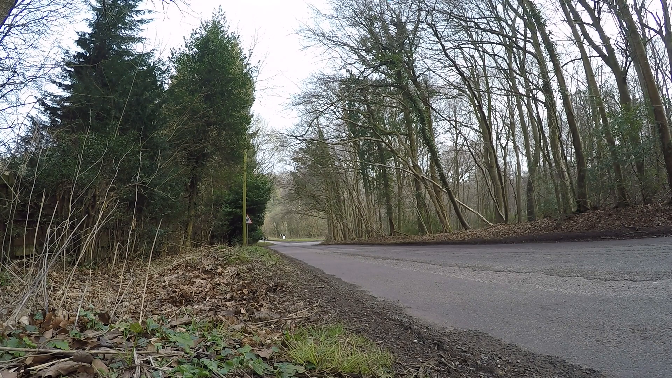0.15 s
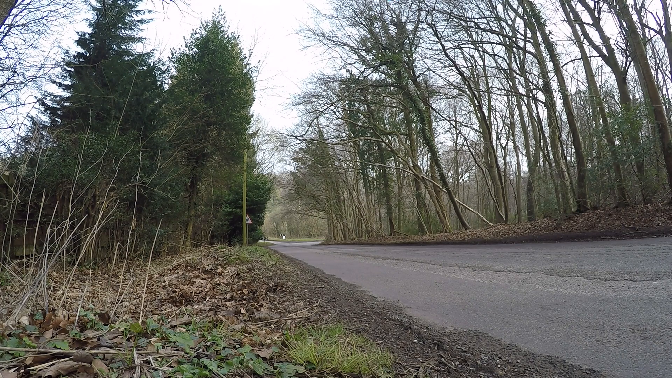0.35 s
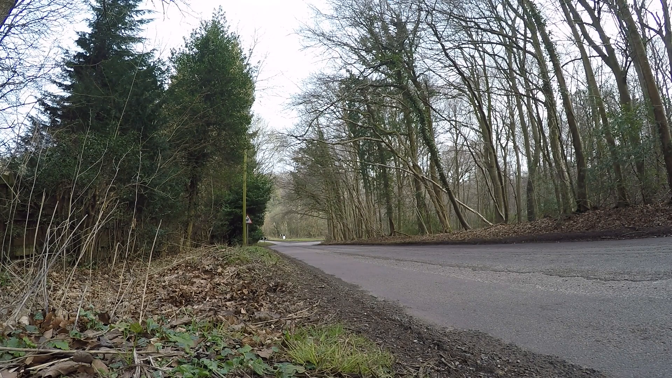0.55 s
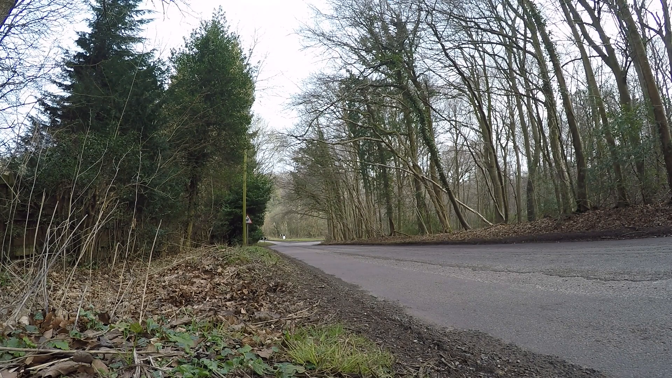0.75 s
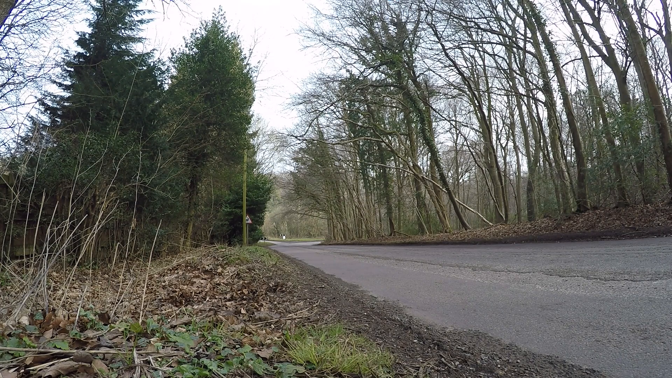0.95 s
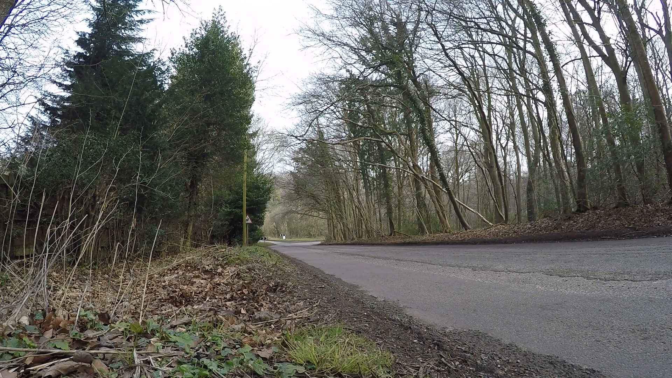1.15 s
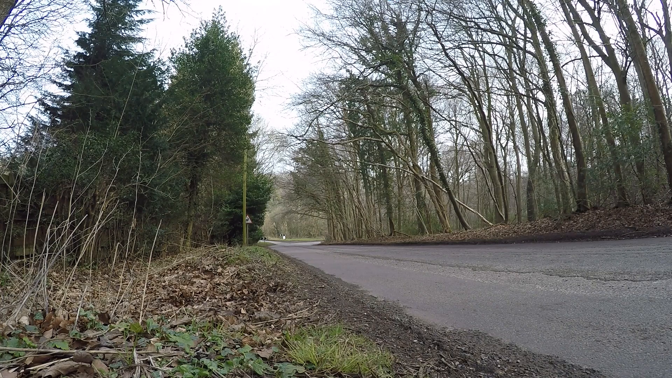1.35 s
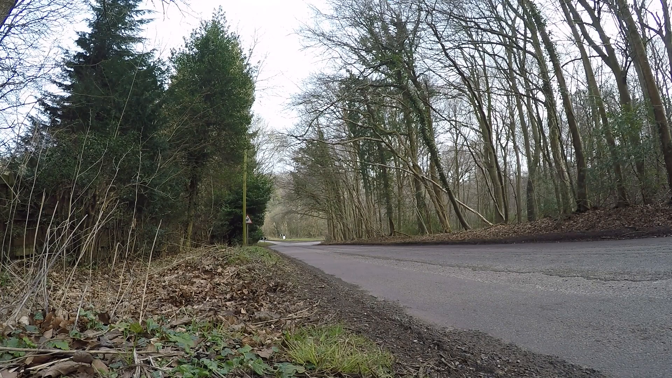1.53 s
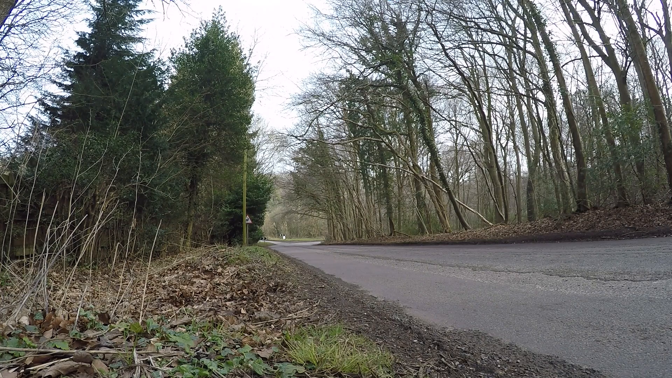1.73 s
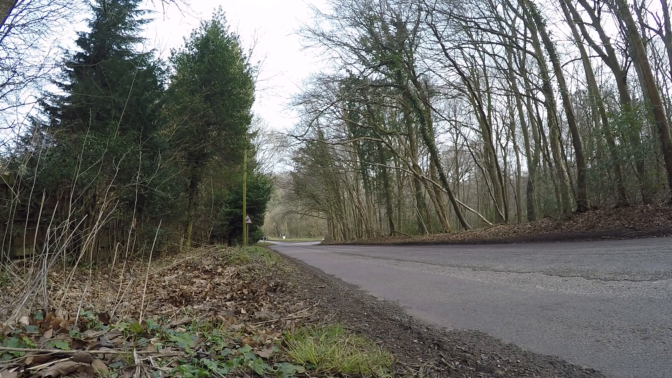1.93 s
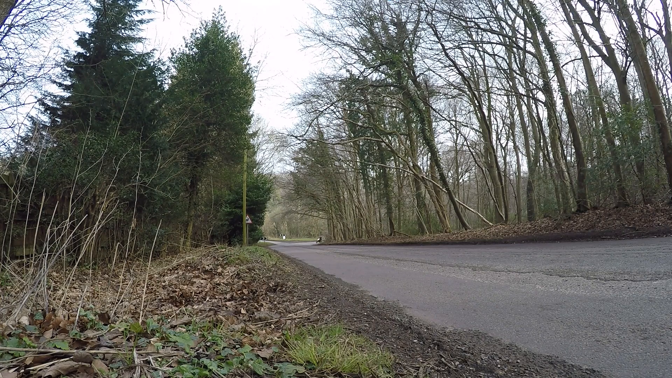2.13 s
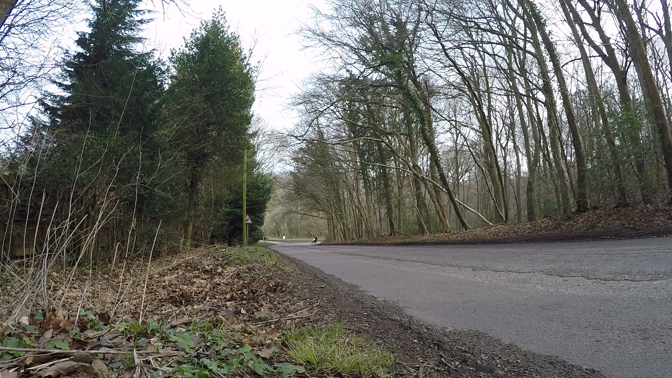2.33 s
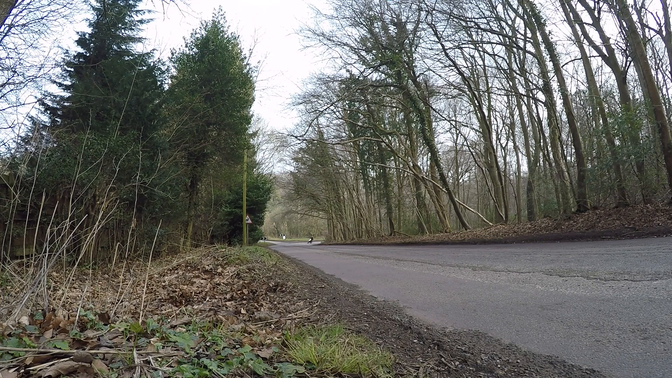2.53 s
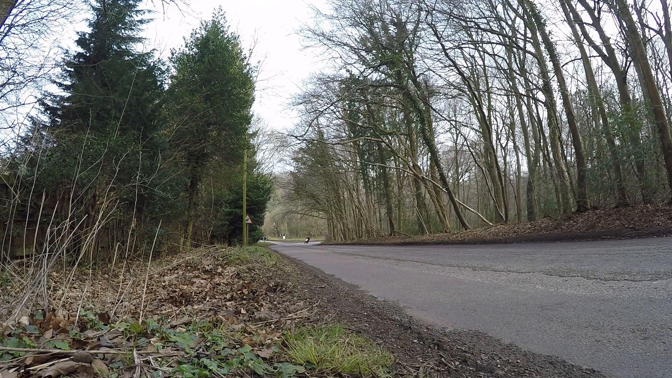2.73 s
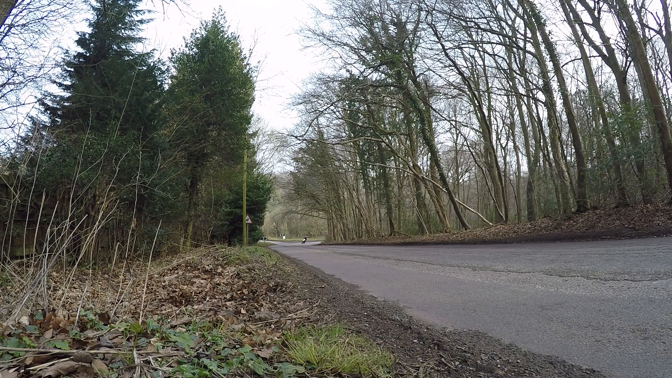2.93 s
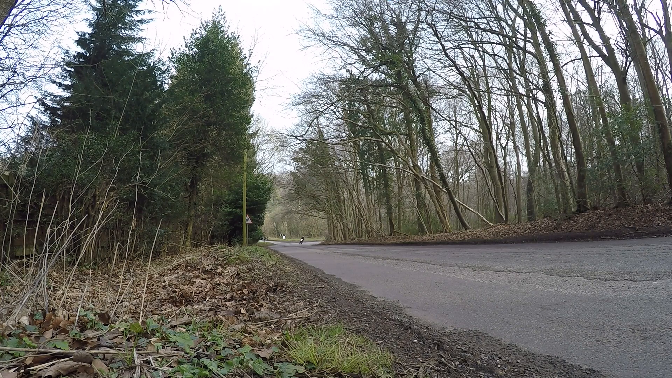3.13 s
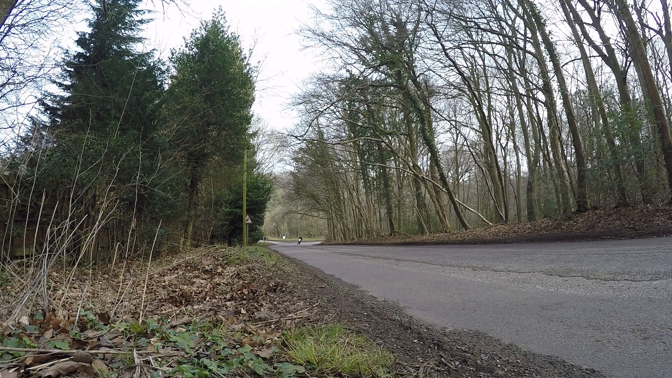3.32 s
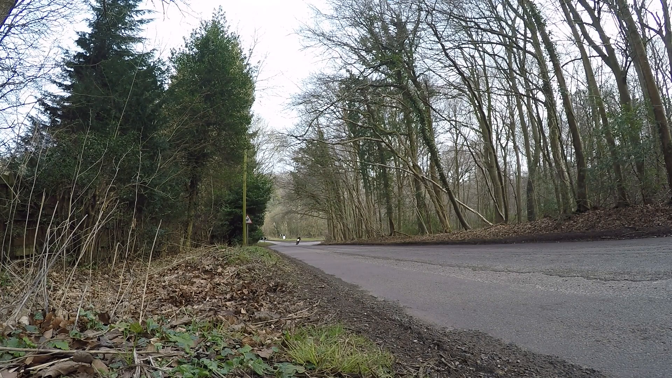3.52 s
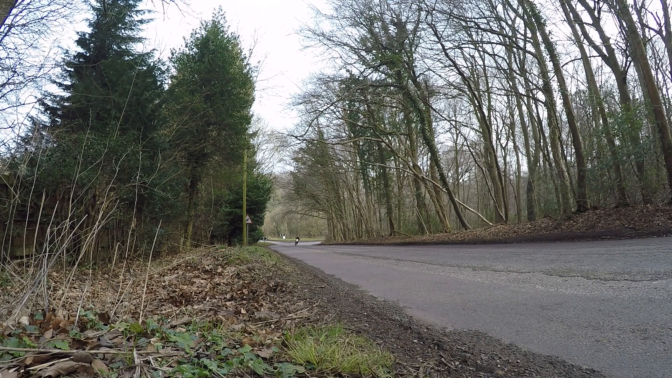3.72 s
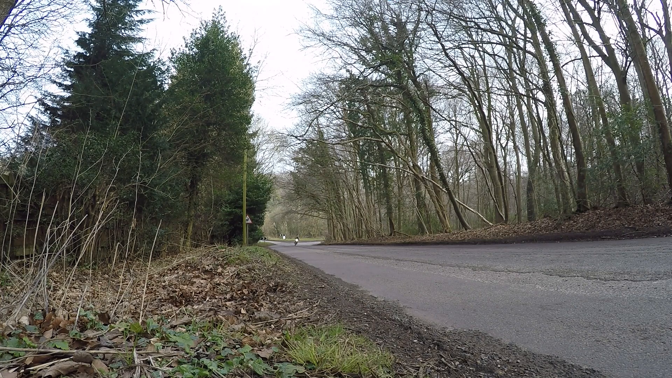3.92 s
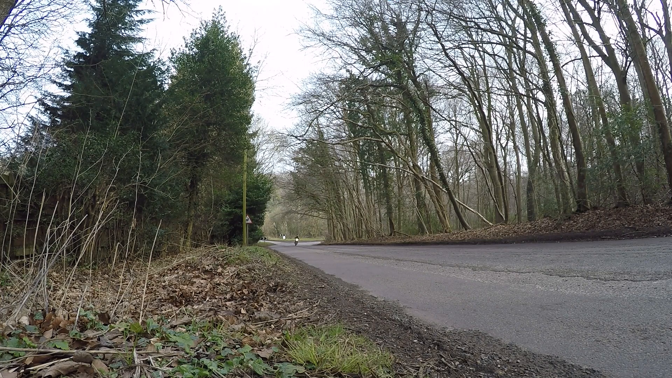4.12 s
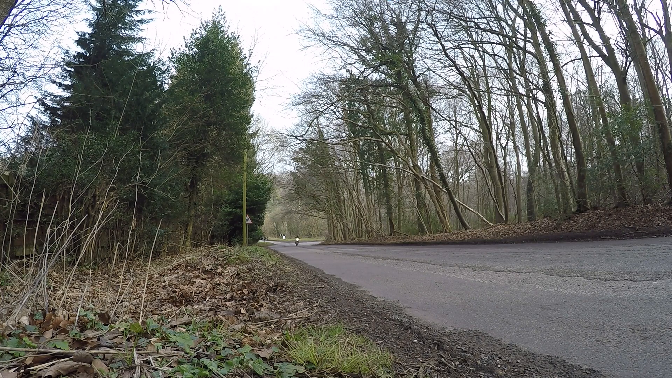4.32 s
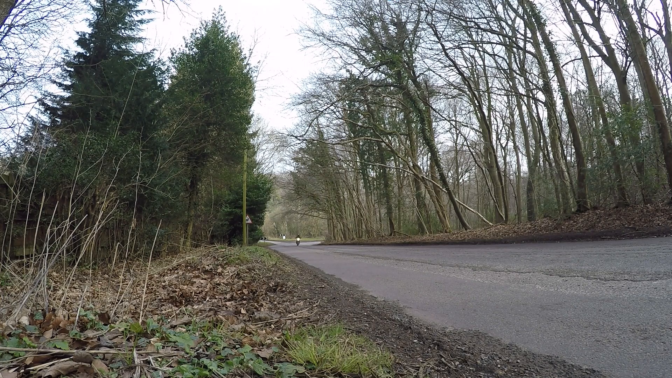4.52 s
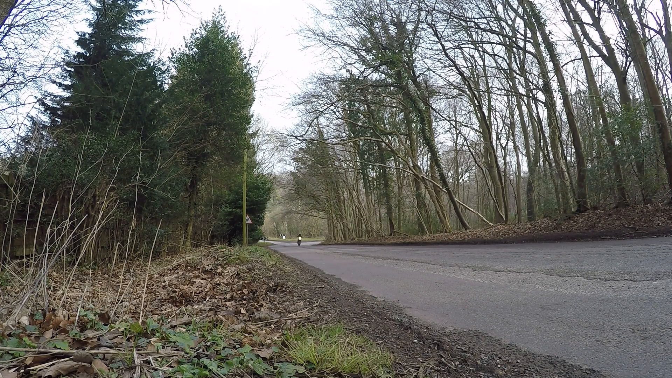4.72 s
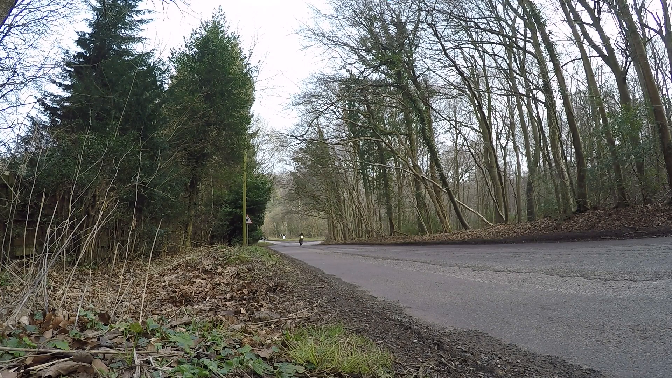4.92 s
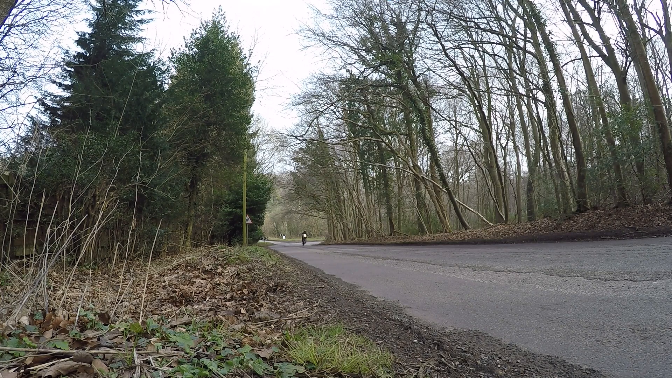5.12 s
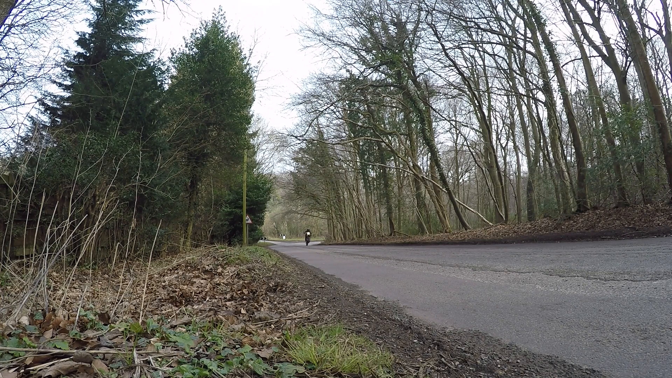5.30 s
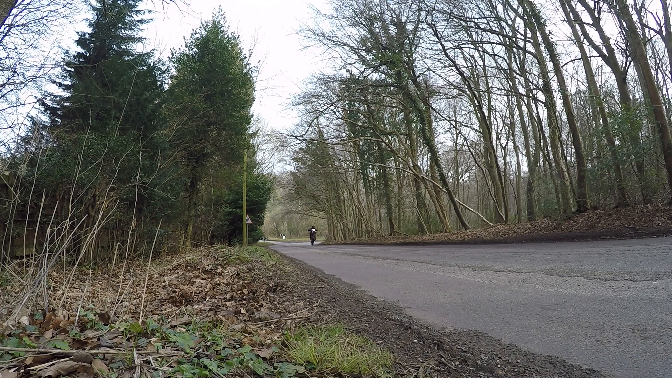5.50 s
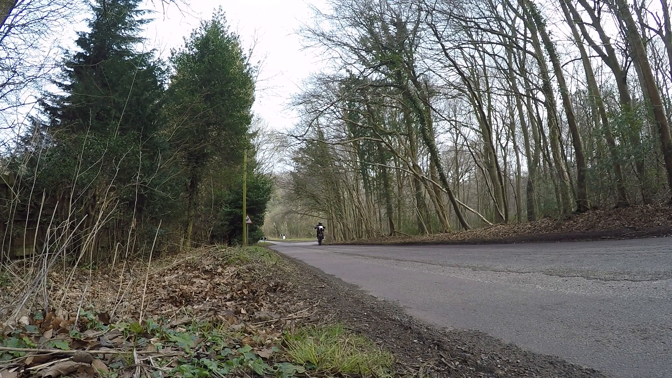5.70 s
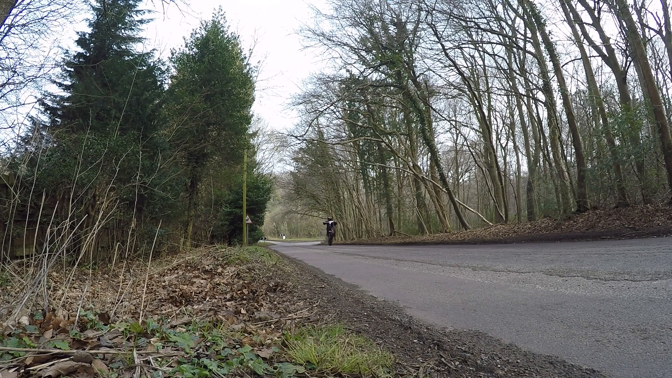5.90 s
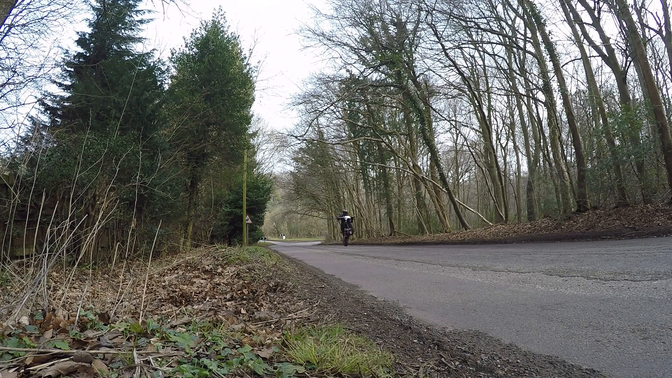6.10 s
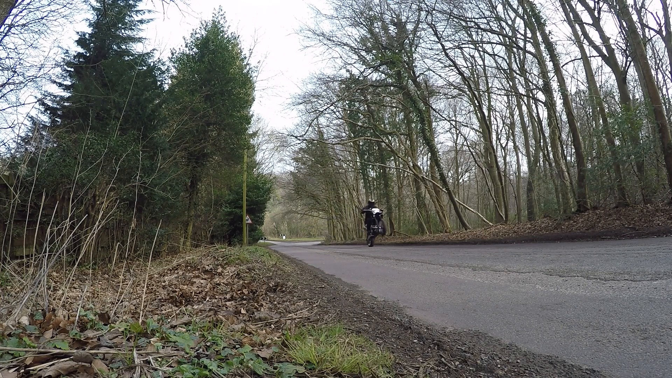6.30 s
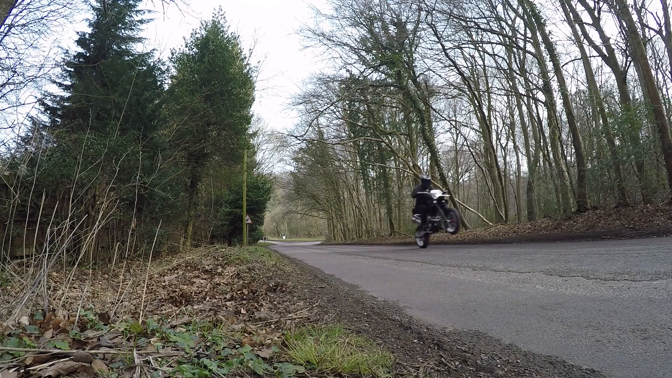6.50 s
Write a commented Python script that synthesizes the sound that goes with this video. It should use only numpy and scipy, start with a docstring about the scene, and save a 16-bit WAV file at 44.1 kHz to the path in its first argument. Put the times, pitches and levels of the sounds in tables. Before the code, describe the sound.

Quiet forest air and light microphone hiss surround a distant single-cylinder motorcycle. From 0 to 2 seconds it coasts, soft low thumps slowing from about 45 to 32 per second while an initial echoing wash fades among the trees; a thin high whine, sinking slightly, flickers around 0.5 to 1.2 seconds. At about 2.2 seconds the revs jump in a brief downshift blip, ringing in the wood with a faint hiss, then drop back. From 2.6 seconds the engine pulls, slowly at first, the firing rate climbing and the drone growing stronger from 4 seconds. Growl, bark and gas rasp thicken, with a hard echo. Around 5.6 to 6.1 seconds the power surges and sags briefly. From 6.15 seconds the exhaust brays harshly, bright and crackling, overloading the roadside microphone until the sound ends at 6.55 seconds, at its loudest, just before passing.

```python
"""On a quiet forest road a single-cylinder four-stroke supermoto rolls towards the microphone, coasting under a thin
whine; its revs blip for a downshift, with a hiss behind them, then it pulls hard until it is nearly alongside.
Each firing thumps the lowest orders, rings the open pipe and drives out rasping gas; one hard echo doubles this and
the tree trunks scatter it. Close by, the pipe mouth brays, and the loudest peaks overload the microphone."""
import sys
import numpy as np
from scipy import signal
from scipy.fft import rfft, irfft, next_fast_len
from scipy.io import wavfile
from scipy.ndimage import uniform_filter1d

SR = 44100
rng = np.random.default_rng(int(sys.argv[2]) if len(sys.argv) > 2 else 0)


def output_pcm(signal):
    """Save a mono or channel-first signal as 16-bit PCM at the path in sys.argv[1].

    Samples are clipped to [-1, 1] before scaling.
    """
    pcm = np.clip(np.atleast_2d(signal).T, -1, 1) * 32767
    wavfile.write(sys.argv[1], SR, np.round(pcm).astype(np.int16))


N = 288855
TIME = np.arange(N) / SR
# closest distance of the bike's line to the microphone, and the distance at which levels are stated
KERB_M, REFERENCE_M = 1.8, 30
# distance around which the straight path starts to win over the trees
CLEAR_M = 9.8


def undb(db):
    """Decibels to gain."""
    return 10 ** (np.asarray(db) / 20)


def curves(table):
    """Each column of a table, joined by straight lines in time."""
    s, *columns = np.transpose(table)
    return [np.interp(TIME, s, column) for column in columns]


def unit(x):
    """Scale to rms 1."""
    return x / np.sqrt(np.mean(x ** 2))


def band(x, lo_hz, hi_hz, order=3):
    """Band-pass; the lower the band, the later its pulses arrive."""
    edges_hz = [lo_hz, min(hi_hz, .47 * SR)]
    return signal.sosfilt(signal.butter(order, edges_hz, "band", fs=SR, output="sos"), x)


def ring(x, modes):
    """Sum of resonances, each given by its Hz, width in Hz and dB."""
    return sum(undb(db) * signal.lfilter(*signal.iirpeak(hz, hz / width, fs=SR), x)
               for hz, width, db in modes)


def noise(points):
    """Noise of rms 1 whose spectrum runs through points of Hz and relative dB."""
    hz, db = np.transpose(points)
    size = next_fast_len(N)
    bins_hz = np.maximum(np.fft.rfftfreq(size, 1 / SR), 1)
    gain = undb(np.interp(np.log(bins_hz), np.log(hz), db))
    return unit(irfft(rfft(rng.standard_normal(size)) * gain, size)[:N])


def at_level(x, db, size=3500):
    """Give a sound (channels, samples) a running level; single firings keep their shape."""
    power = uniform_filter1d(uniform_filter1d(np.mean(x ** 2, axis=0), size), size)
    return x * undb(db) / np.sqrt(np.maximum(power, 1e-18))


def walk(rate):
    """Random levels held 1 / rate s and slewed twice; spread near 1."""
    k = int(SR / rate)
    held = np.repeat(rng.standard_normal(256), k)[:N]
    return 1.3 * uniform_filter1d(uniform_filter1d(held, k), k)


def per_firing(cycles):
    """One random value for each firing, gliding over to the next between the firings."""
    draws = rng.standard_normal(1024)
    held = draws[np.floor(cycles + .4).astype(int) + 1]
    return uniform_filter1d(uniform_filter1d(held, size=230), size=230)


def throttle():
    """Opening of the throttle, 0-1."""
    # nearly shut, a long steady roll on, then brief lifts. Each row: time in seconds, opening 0-1
    opening = [(1.25, 0.08), (1.6, 0.13), (1.92, 0.23), (2.17, 0.23), (2.25, 0.28), (2.42, 0.34),
               (2.73, 0.4), (3.4, 0.56), (3.71, 0.53), (3.86, 0.67), (4.03, 0.73), (4.4, 0.84),
               (4.635, 0.75), (4.685, 0.96), (5.53, 0.86), (5.67, 0.68), (5.84, 0.87), (6.0, 0.69),
               (6.13, 0.59), (6.23, 0.72), (6.55, 0.86)]
    return np.clip(curves(opening)[0], 0, 1)


def distance():
    """Metres from the microphone to the bike, which rides a straight line at a steady speed."""
    speed_m_s, passes_s = 21.2, 6.952
    return np.hypot(speed_m_s * (passes_s - TIME), KERB_M)


def loudness(register):
    """A register of the exhaust grows with the throttle and with nearness."""
    full_db, shut_db, bend, halving_db = register
    return full_db - shut_db * (1 - throttle()) ** bend + halving_db * np.log2(REFERENCE_M / distance())


def trees(x, t60_s=1.0, first_s=0.025, side_db=-17):
    """Countless echoes, as from trunks, nearly alike at the two close microphone ports."""
    t = np.arange(SR) / SR
    envelope = np.exp(-np.log(1000) * t / t60_s) * (1 - np.exp(-t / first_s))
    mid, side = rng.standard_normal((2, SR)) * envelope
    echoes = (mid + undb(side_db) * np.array([side, -side])) / np.linalg.norm(mid)
    return signal.fftconvolve(x[None], echoes, axes=1)[:, :N]


def background(air_db=-38, flicker_db=2):
    """Quiet air and microphone hiss under flickering whines of narrow noise; the lowest sinks in pitch."""
    # still forest air and microphone hiss. Each row: frequency in Hz, relative level in dB
    air = [(30, 16), (100, 20), (400, -6.5), (1500, -13.5), (4000, -18.5), (8000, -37.5), (15000, -36)]
    # faint high whines. Each row: centre in Hz, width in Hz, level in dB before the flicker
    high_whines = [(7250, 800, -76.5), (8330, 110, -78), (13600, 600, -86)]
    # whine that comes and goes as the bike coasts. Each row: time in seconds, level in dB before the flicker
    coast_level = [(0, -87), (0.5, -65), (1.1, -71), (1.5, -96)]
    coast_hz, sag_hz_per_s, coast_width_hz = 3750, 210, 130

    def whine(hz, width):
        lowpass = signal.butter(2, width / 2, fs=SR, output="sos")
        waver = signal.sosfilt(lowpass, rng.standard_normal(N))
        carrier = np.cos(2 * np.pi * np.cumsum(hz * np.ones(N)) / SR)
        return unit(waver * carrier) * undb(flicker_db * walk(9.55))

    high = sum(undb(db) * whine(hz, width) for hz, width, db in high_whines)
    coast = whine(coast_hz - sag_hz_per_s * TIME, coast_width_hz)
    return undb(air_db) * noise(air) + high + undb(curves(coast_level)[0]) * coast


def wash(fade_db_per_s=16, rise_s=0.0077):
    """Hard bursts of throttle ring on in the wood: coloured noise that rises fast and fades slowly."""
    # colour of the ringing wood. Each row: frequency in Hz, relative level in dB
    wood_colour = [(200, 5.5), (300, 5.5), (450, -1.5), (1200, -4), (1950, -3), (2900, -8.5), (4500, -19),
                   (7000, -38), (12000, -57)]
    # bursts that ring on. Each row: start in seconds, level in dB from which it fades
    bursts = [(0, -41), (2.22, -48.5)]
    level = 0
    for start_s, db in bursts:
        t = np.maximum(TIME - start_s, 0)
        level = level + undb(db - fade_db_per_s * t) * (1 - np.exp(-t / rise_s))
    return noise(wood_colour) * level


def thump(cycles, hz, lag_s=0.02963, trim_db=0.7):
    """The slugs of gas leaving the pipe push out the lowest orders; no two firings are equally strong."""
    # lowest engine orders. Each row: multiple of the firing rate, relative dB, dB more at full throttle
    low_orders = [(1, -2, -4.5), (2, 0.5, -1.5), (3, -1.5, -7.5)]
    # how well the pipe carries them. Each row: frequency in Hz, relative level in dB
    drone_colour = [(30, 1.5), (45, -3), (64, 2), (72, -1.5), (86, 2), (103, -6.5), (118, 0), (130, 4.5),
                    (150, -1.5), (185, 2.5), (205, 2)]
    # running level of the low drone. Each row: time in seconds, level in dB before the trim
    drone_level = [(0, -26.5), (0.4, -26), (1.2, -36.5), (2.12, -32.5), (2.3, -29.5), (2.55, -33.5),
                   (3.7, -32), (4.1, -22), (4.55, -19.5), (4.68, -23), (4.9, -18.5), (5.15, -21),
                   (5.4, -18), (5.6, -20), (6.0, -18.5), (6.27, -9), (6.38, -16), (6.55, -11)]
    scatter_db, waver_db = 1.3, 1.4
    wobble = .018  # firings, at full throttle
    late = cycles - lag_s * hz + wobble * throttle() * walk(14)
    colour_hz, colour_db = np.transpose(drone_colour)
    orders = np.zeros(N)
    for k, db, load_db in low_orders:
        carried_db = np.interp(k * hz, colour_hz, colour_db)
        random_db = waver_db * walk(11) + scatter_db * per_firing(cycles)
        gain = undb(db + load_db * throttle() + carried_db + random_db)
        orders -= gain * np.cos(2 * np.pi * round(k) * late)
    return at_level(orders[None], curves(drone_level)[0] + trim_db)[0]


def round_trips(x, trip_s=0.00654, heat=0.26, return_db=-4, flow_loss_db=-10, dull_hz=520, count=3):
    """The pressure wave runs up and down the pipe, duller each time; hot gas speeds it, strong flow damps it."""
    trip = trip_s / (1 + heat * throttle())
    kept = undb(return_db + flow_loss_db * throttle() ** 2)
    waves = [x]
    for _ in range(count):
        rounded = signal.lfilter(*signal.butter(1, dull_hz, fs=SR), waves[-1])
        waves.append(kept * np.interp(TIME - trip, TIME, rounded, left=0))
    return sum(waves)


def blowdown(cycles, hz):
    """One pressure spike per firing rings the pipe; under load firings are more even in time, less in strength."""
    # silencer resonances. Each row: frequency in Hz, width in Hz, relative level in dB
    pipe_modes = [(131, 39, 7), (211, 84, 10.5), (290, 34, 0), (341, 330, -0.5), (417, 46, -1),
                  (600, 310, -5), (920, 170, -9), (1330, 280, 3)]
    # load steepens the pressure front: corner of the pulse, throttle shut and open
    shut_hz, open_hz, bend = 61.5, 1250, 1.37
    corner_hz = shut_hz + (open_hz - shut_hz) * throttle() ** bend
    scatter_db = .7 + 1.1 * throttle() ** 2
    idle_jitter, load_jitter = .007, .005  # firings
    jitter = idle_jitter + (load_jitter - idle_jitter) * throttle()
    z = np.exp(-hz / corner_hz + 2j * np.pi * (cycles + jitter * per_firing(cycles)))
    # a geometric series from the fourth order up: the higher the corner, the sharper the spike
    spikes = np.real(z ** 4 / (1 - z))
    uneven = spikes * undb(scatter_db * per_firing(cycles))
    return unit(ring(round_trips(uneven), pipe_modes))


def gas(cycles, far_decay=0.27, near_decay=0.17, steady=0.057):
    """Turbulent gas bursts out and dies away within each cycle; close by, the bursts are crisper."""
    # gas jet at the pipe mouth. Each row: frequency in Hz, relative level in dB
    jet_colour = [(300, 2.5), (600, -5.5), (1050, -2.5), (1500, -1), (2200, -2.5), (3100, -4.5),
                  (4400, -7.5), (6500, -18.5), (9000, -23), (12500, -33.5), (15500, -58)]
    scatter_db = 1.4
    decay = near_decay + (far_decay - near_decay) / (1 + (CLEAR_M / distance()) ** 2)  # in firings
    puff = np.exp(-(cycles % 1) / decay) * undb(scatter_db * per_firing(cycles))
    return unit((steady + puff) * noise(jet_colour))


def shock(cycles, hz, front_s=0.00012, smear_s=0.011, smear_db=0):
    """Under load each firing leaves the pipe as a sharp crack with a short rattle behind it."""
    jitter = .011  # firings
    since_s = ((cycles + jitter * per_firing(cycles) + .5) % 1 - .5) / hz
    crack = band(-np.exp(-(since_s / front_s) ** 2) * throttle(), 620, 4700, order=1)
    rattle = trees(crack, t60_s=smear_s, first_s=0.00056)[0]
    return unit(crack + undb(smear_db) * rattle)


def surges():
    """Gain of the exhaust as the combustion surges and sags."""
    # firings that burn harder or weaker. Each row: centre in seconds, half length in seconds, gain in dB
    burns = [(2.23, 0.037, 8.5), (2.422, 0.069, -8), (2.73, 0.036, -6), (2.775, 0.013, 3),
             (3.693, 0.073, 0), (3.82, 0.0059, 3), (3.88, 0.0098, 0.5), (4.44, 0.3, -2), (4.622, .05, 0),
             (5.367, 0.15, 1.5), (5.647, 0.1, -3.5), (5.794, 0.11, 1.5), (6.043, 0.084, -2.5),
             (6.243, 0.093, 0)]
    return undb(sum(db * np.exp(-((TIME - s) / half_s) ** 2) for s, half_s, db in burns))


def two_paths(x, echo_s=0.0259, straight_db=-4, halving_db=7.5):
    """Straight sound and one hard echo from behind the microphone: orders swell and fade through their comb."""
    # the ground weakens the straight path against the echo, less so as the bike nears
    straight = undb(straight_db + halving_db * np.log2(REFERENCE_M / distance()))
    echo = np.interp(TIME - echo_s, TIME, x, left=0)
    return (straight * x + echo) / np.hypot(straight, 1)


def ports(x, lag_s=0.00002, scatter_db=3, nearness=1.64):
    """Close by, the left port hears later, and a short diffuse scatter joins the two with opposite signs."""
    lag = lag_s * (KERB_M / distance()) ** 1.1
    slope = np.gradient(x, axis=1) * SR
    diffuse = trees(x[0], t60_s=0.0024, first_s=0.00033)[0]
    scatter = undb(scatter_db) * (KERB_M / distance()) ** nearness * diffuse
    return x + np.array([[-1], [1]]) * (slope * lag / 2 + scatter)


def motorcycle():
    """Thump, ringing pipe and gas jet, heard straight, off one hard echo and through the trees."""
    # engine speed as heard. Each row: time in seconds, firings per second in Hz
    firing_rate = [(0, 44.79), (0.474, 42.03), (0.974, 39.49), (1.274, 36.67), (1.624, 35.78),
                   (2.104, 31.91), (2.274, 44.27), (2.564, 31.54), (2.874, 32.22), (3.374, 34.16),
                   (3.674, 36.29), (4.024, 40.8), (4.134, 41.81), (4.324, 44.32), (4.524, 45.01),
                   (4.774, 51.62), (4.944, 53.34), (5.494, 64.04), (5.674, 64.34), (5.894, 68.37),
                   (6.004, 67.6), (6.074, 64.19), (6.154, 66.31), (6.234, 65.36), (6.55, 71.92)]
    # the pipe mouth whistles in the gas. Each row: frequency in Hz, width in Hz, relative level in dB
    mouth_modes = [(1320, 1400, 9.5), (1690, 200, -22), (2330, 920, 8)]
    # bass from the trees against the straight path. Each row: time in seconds, relative level in dB
    bass_scatter = [(0, 3), (2.2, -0.5), (2.8, -12.5), (3.85, -4.5), (4.5, 2.5), (5.4, 5), (5.85, 3),
                    (6.55, 1.5)]
    # registers from deep to bright. Each row: dB at full throttle and the reference distance,
    # dB lost with the throttle shut, bend of that loss (higher speaks earlier), dB gained per halved distance
    boom_level = (-20.5, 18.5, 5.5, 4)
    growl_level = (-17.5, 45, 3, 4.5)
    bark_level = (-19, 76.5, 3, 3.5)
    rasp_level = (-20, 57, 1.55, 5)
    crackle_level = (-19, 72.5, 1.5, 5.5)
    hiss_level = (-25.5, 78, 1.9, 7)
    sizzle_level = (-37.5, 49.5, 1.13, 14)

    hz, = curves(firing_rate)
    cycles = np.cumsum(hz) / SR - .22  # counts the firings
    # from far off the ground weakens the straight path of the treble, so most of it comes from the trees
    bass_wet = undb(curves(bass_scatter)[0])
    treble_wet = undb(4.5) / (1 + (CLEAR_M / distance()) ** 2) ** 1.66

    low = thump(cycles, hz)
    pipe = two_paths(blowdown(cycles, hz))
    jet = two_paths(gas(cycles))
    crack = two_paths(shock(cycles, hz))

    low = undb(-0.5) * low + undb(-6.5) * trees(low, t60_s=1.0, side_db=-20.5)
    fizz = jet + undb(-22.5) * crack + treble_wet * trees(jet, t60_s=1.0, side_db=-106)
    pipe_trees = trees(pipe, t60_s=1.0, first_s=0.005, side_db=-24.0)
    body = pipe + bass_wet * pipe_trees + undb(-14.5) * fizz
    mouth = undb(-9.0) * pipe + undb(7) * ring(jet, mouth_modes) + undb(5) * crack
    whistling_jet = jet + undb(3.5) * ring(jet, mouth_modes)
    spray = mouth + treble_wet * trees(whistling_jet, t60_s=0.99, first_s=0.045, side_db=-61)

    boom = at_level(band(body, 140.0, 215.4, order=2), loudness(boom_level))
    # the boom falls silent once the revs lift the fourth order above it
    boom = boom / (1 + (4 * hz / 225) ** 16)
    growl = at_level(band(body, 245, 403, order=2), loudness(growl_level))
    bark = at_level(band(body + undb(-33.0) * fizz, 445.5, 910, order=4), loudness(bark_level))
    rasp = at_level(band(spray, 967, 1755), loudness(rasp_level))
    crackle = at_level(band(spray, 1830, 3500), loudness(crackle_level))
    hiss = at_level(band(fizz, 2430, 6400), loudness(hiss_level))
    sizzle = at_level(band(fizz, 8700, 24300), loudness(sizzle_level))

    deep = low + np.sqrt(surges()) * boom + surges() * (growl + bark)
    bright = rasp + bray(crack, jet) + crackle + hiss + sizzle
    return ports(deep + bright)


def blip_hiss(lo_hz=2900, hi_hz=5400):
    """A distant hiss, band-passed noise, comes up with the downshift and stays under the engine."""
    # hiss that follows the blip. Each row: time in seconds, level in dB
    hiss_rise = [(2.2, -75), (2.28, -58.5), (2.7, -62.5), (3.3, -59)]
    return unit(band(rng.standard_normal(N), lo_hz, hi_hz, order=2)) * undb(curves(hiss_rise)[0])


def bray(crack, jet, gas_db=-5):
    """Pressure spikes and gas puffs ring the pipe mouth on every firing, loudest at close range."""
    # braying mouth. Each row: frequency in Hz, width in Hz, relative level in dB
    bray_modes = [(1205, 26, -3), (1390, 135, -1), (2120, 1460, -5.5)]
    # running level of the bray. Each row: time in seconds, level in dB
    bray_level = [(2.6, -89), (2.9, -60), (3.6, -46.5), (5.65, -36), (5.8, -26.5), (5.98, -54), (6.12, -45),
                  (6.17, -22), (6.25, -17), (6.4, -13), (6.55, -11.5)]
    spikes, puffs = (unit(band(ring(x, bray_modes), 930, 2520)) for x in (crack, jet))
    return at_level((spikes + undb(gas_db) * puffs)[None], curves(bray_level)[0])


def scene():
    """The motorcycle on the quiet forest road."""
    return motorcycle() + wash() + blip_hiss() + background()


def record(dry, drive_db=1.13, knee=17.0, top_hz=15700):
    """The microphone flattens the loudest peaks, and a steep low-pass cuts the top."""
    x = dry * undb(drive_db)
    clipped = x / (1 + np.abs(x) ** knee) ** (1 / knee)
    return signal.sosfilt(signal.ellip(10, .1, 70, top_hz, fs=SR, output="sos"), clipped)


dry = scene()
out = record(dry)
output_pcm(out)
```